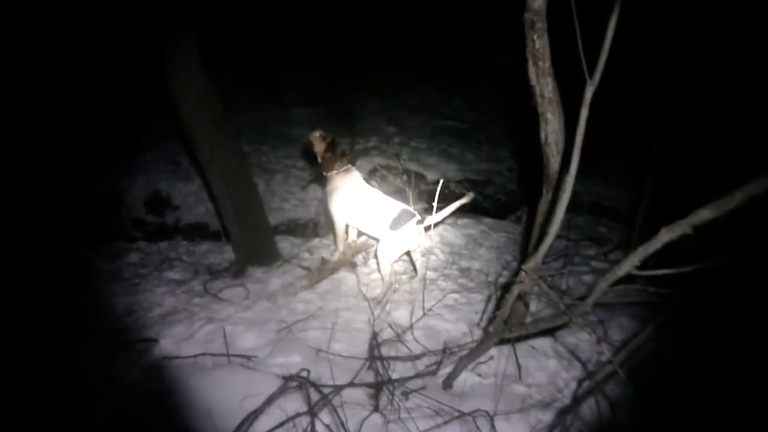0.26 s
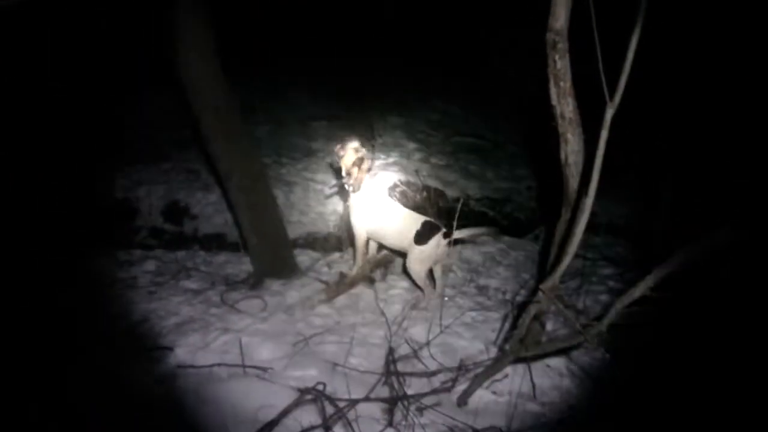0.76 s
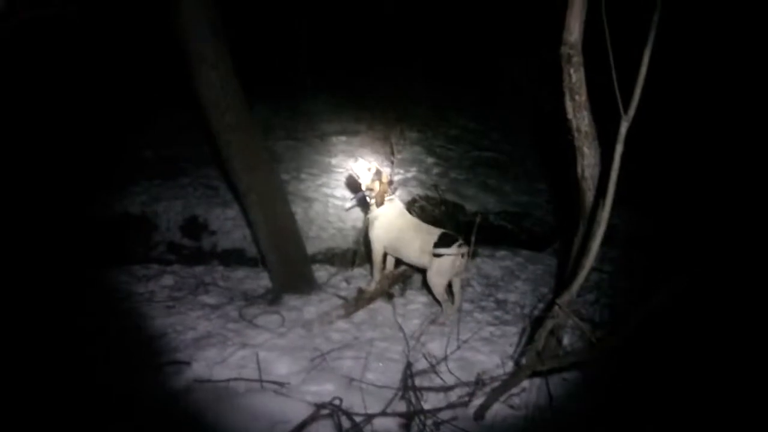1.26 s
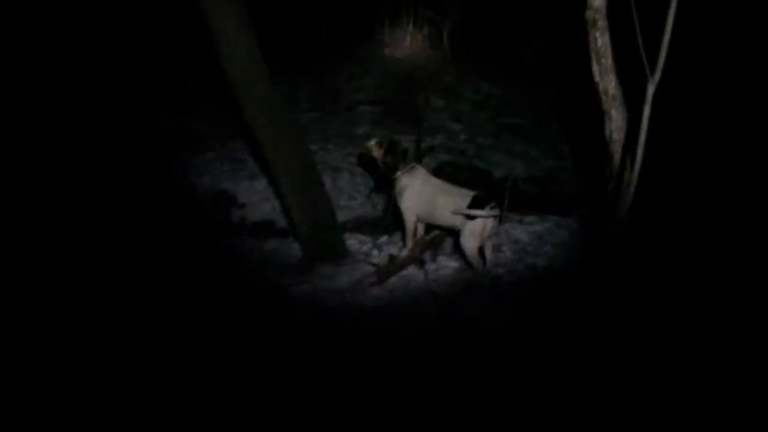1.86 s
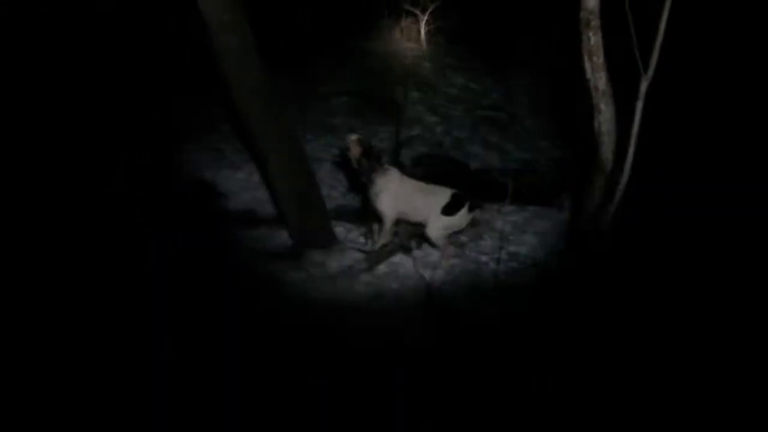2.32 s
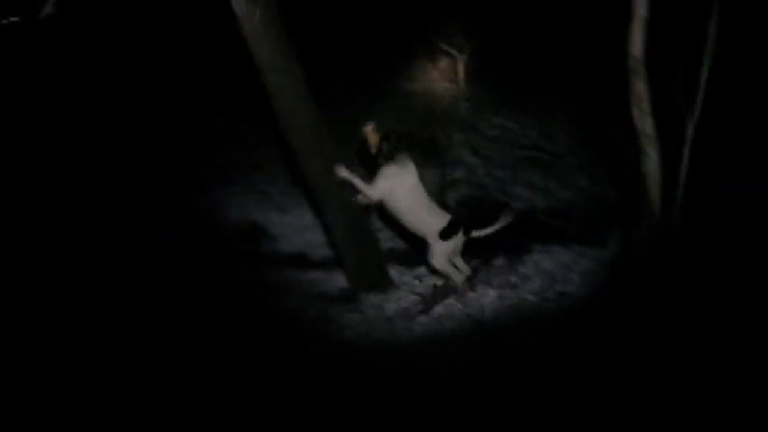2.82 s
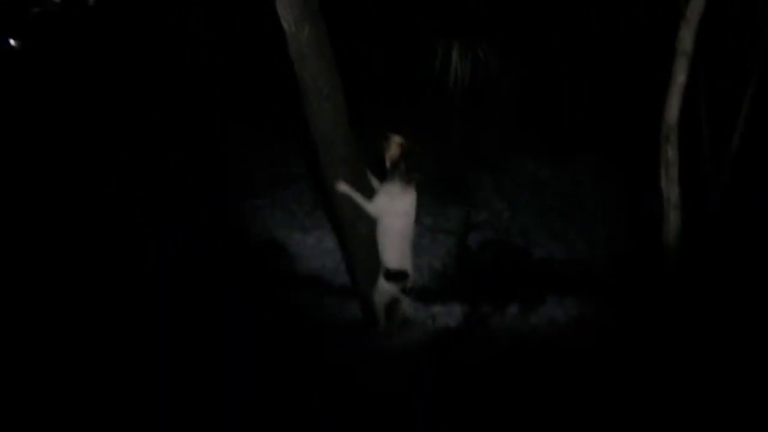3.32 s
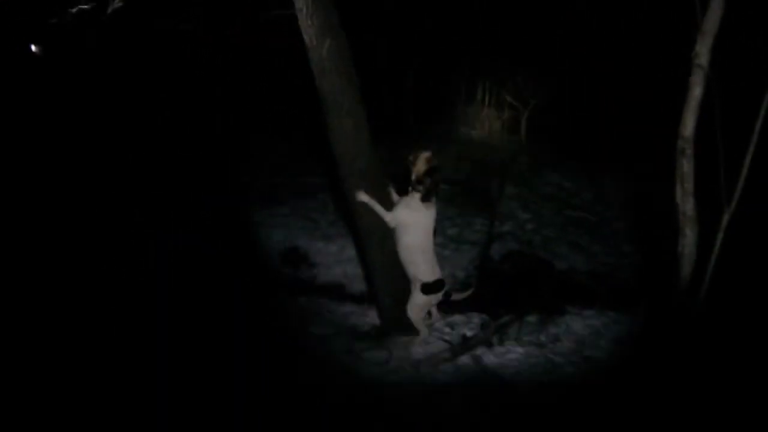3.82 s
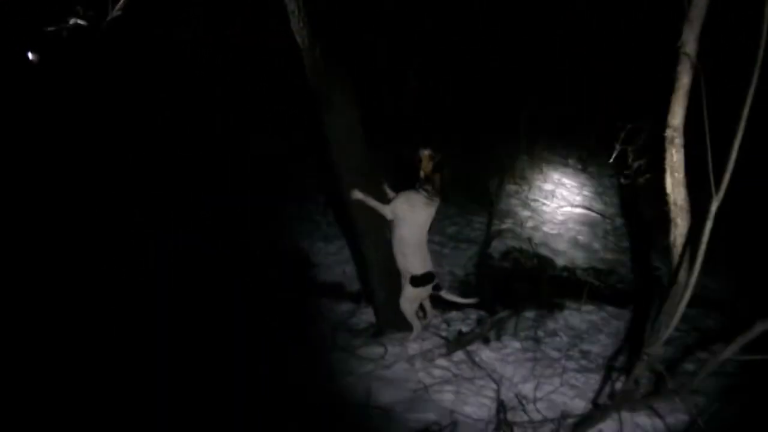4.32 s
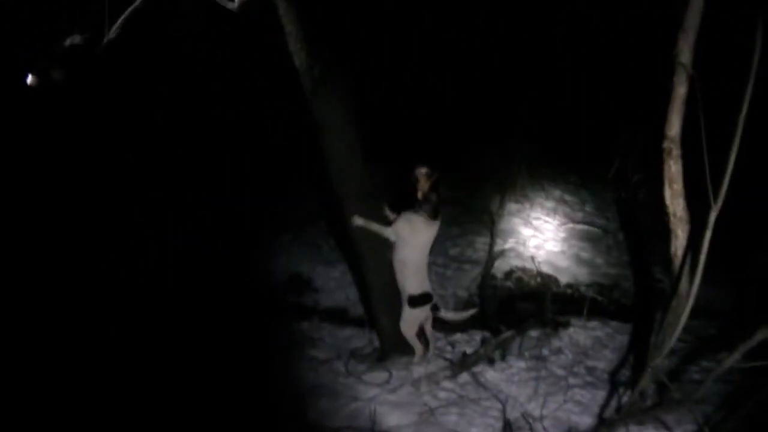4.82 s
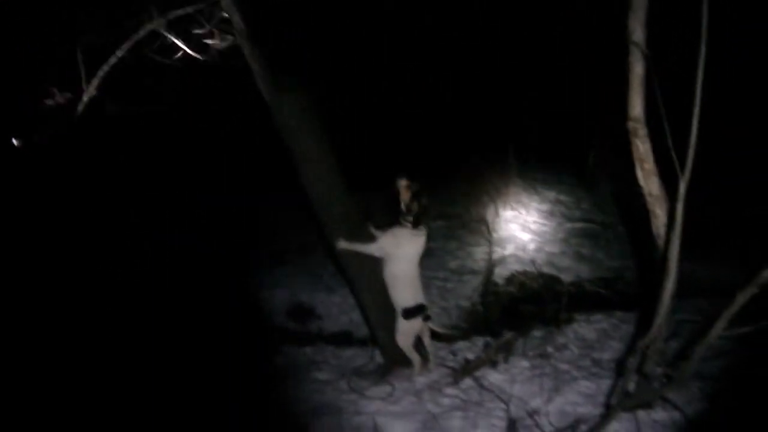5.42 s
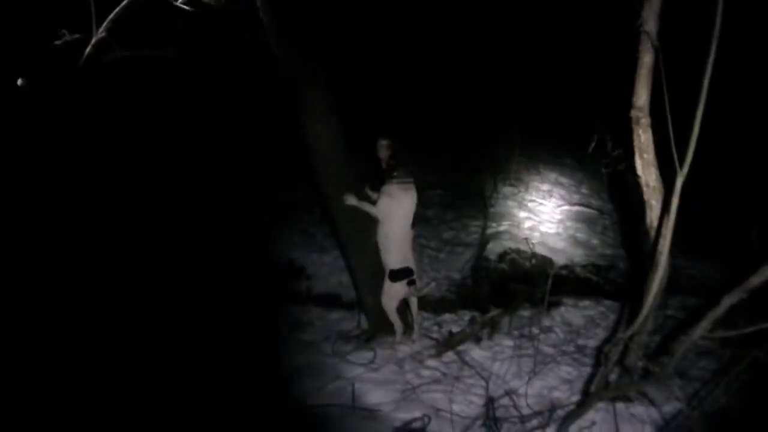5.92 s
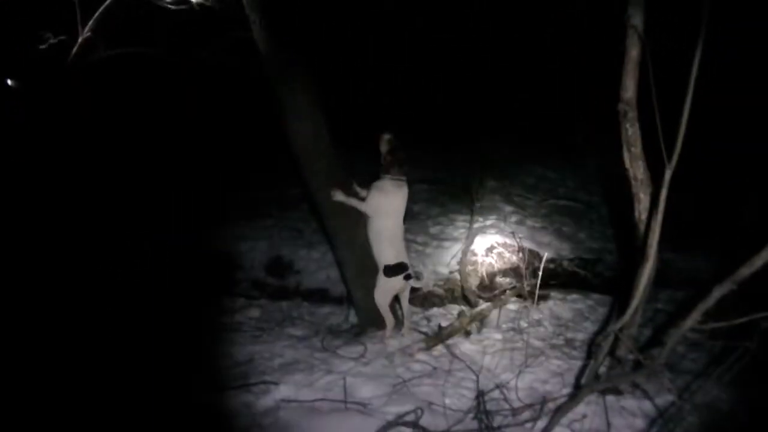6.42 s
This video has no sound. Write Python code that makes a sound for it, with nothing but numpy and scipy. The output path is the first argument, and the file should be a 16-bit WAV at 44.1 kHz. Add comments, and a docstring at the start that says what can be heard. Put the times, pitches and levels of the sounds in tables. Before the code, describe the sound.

A hound barks in quiet woods, centred a few metres ahead of a stereo microphone. The first bark is already under way at the start; others follow at about 0.7, 1.5, 2.2, 2.9, 3.3, 3.8, 4.4, 5.0, 5.7 and 6.2 seconds. Each is short, rising then dropping in pitch, hoarse at both ends and clear on top, and rings among the trees for about a second. Much quieter, paws crunch and thud in snow from 0.5 seconds, with a brief gritty skid near 1.9. Scuffing and scratching on a tree trunk are busiest from 2.4 to 4 seconds. A small collar ring jingles faintly between 2.9 and 3.7 seconds. Dry twigs snap here and there, most clearly at 3.5 and 5.1 seconds. A faint steady hiss with a low, hollow ring of the woods lies underneath throughout.

```python
"""Snowy woods at night: a hound barks up a tree, a few metres straight ahead of a stereo microphone.
Each bark arches in pitch as the vocal folds tighten and slacken, hoarse at both ends and clear on top,
and rings on among the trunks. Paws crunch the snow and scratch the tree, twigs snap and a collar ring
jingles faintly, over a faint hiss and a steady low ring of the woods."""
import sys
import numpy as np
from scipy import signal
from scipy.fft import rfft, irfft, next_fast_len
from scipy.io import wavfile
from scipy.ndimage import map_coordinates

SR = 44100
rng = np.random.default_rng(int(sys.argv[2]) if len(sys.argv) > 2 else 0)


def master_out(mix):
    """Clip the mix to full scale and print it as 16-bit PCM to the path in sys.argv[1]."""
    frames = np.transpose(np.atleast_2d(mix))
    ceiling = np.clip(frames, -1, 1)
    pcm = np.round(ceiling * 32767).astype(np.int16)
    wavfile.write(sys.argv[1], SR, pcm)


N = 293706
TOP_HZ = 15450  # band limit


def amp(db):
    """Decibels to gain."""
    return 10 ** (np.asarray(db) / 20)


def unit(x):
    """Scale to rms 1."""
    return x / np.sqrt(np.mean(x ** 2) + 1e-20)


def along(points, hz):
    """Read (f/Hz, value) points on a log frequency axis."""
    f, v = np.transpose(points)
    return np.interp(np.log(hz + 1), np.log(f), v)


def wobble(rate, size):
    """A smooth random curve, rate knots a second."""
    return map_coordinates(rng.standard_normal(int(size * rate / SR) + 4), [np.arange(size) * rate / SR])


def filtered(x, response):
    """Filter x by a gain that depends on frequency."""
    n = x.shape[-1]
    m = next_fast_len(n + 8192)
    return irfft(rfft(x, m) * response(np.fft.rfftfreq(m, 1 / SR)), m)[..., :n]


def coloured(x, spectrum):
    """Shape x by (f/Hz, level/dB) points, at rms 1."""
    return unit(filtered(x, lambda hz: amp(along(spectrum, hz))))


def rippled(x, depth_db, width_hz, life_s):
    """Pass x through narrow resonances that come and go, at rms 1."""
    z = signal.stft(x, SR, nperseg=256)[2]
    rows, cols = np.indices(z.shape)
    grid = [rows * SR / 256 / width_hz, cols * 128 / SR / life_s]
    field = map_coordinates(rng.standard_normal(z.shape), grid, mode='mirror')
    return unit(signal.istft(z * amp(depth_db * np.tanh(field)), SR, nperseg=256)[1][:len(x)])


def add(track, s, sound):
    """Mix a sound into a track at time s, which may be negative."""
    start = round(s * SR)
    sound = sound[max(-start, 0):]
    part = track[max(start, 0):][:len(sound)]
    part += sound[:len(part)]


def background(db):
    """A faint hiss, wider in the treble, with a steady low ring of the woods near 500 Hz."""
    spectrum = [(25, -15.5), (60, -14), (140, -14), (280, -18), (480, 2.5), (830, -6), (1100, -10.5),
                (1700, -10), (3000, -17.5), (6000, -17), (9000, -21), (12000, -17), (15000, -23)]  # hiss and low ring of the woods: f/Hz, level/dB
    likeness = [(30, .5), (150, 1), (400, 1), (2000, 1), (5000, 0.69), (12000, 0.042)]  # stereo image of the background: f/Hz, left-right correlation
    angle = lambda hz: np.arccos(np.clip(along(likeness, hz), -1, 1)) / 2
    response = lambda hz: amp(along(spectrum, hz)) * [np.cos(angle(hz)), np.sin(angle(hz))]
    mid, side = filtered(rng.standard_normal((2, N)), response)
    return amp(db) * unit(np.array([mid + side, mid - side]))


def woods_response(near_db, near_t60, far_db, slope_db, slope_s):
    """Near trunks scatter a quick answer, the slope returns a dull echo, and the far wood rings on."""
    decay = [(150, 0.61), (480, 1.34), (900, 1.47), (1700, 0.89), (3000, 0.9), (8000, 0.14)]  # ring of the far wood: f/Hz, t60/s
    hz, t, z = signal.stft(rng.standard_normal(SR * 3 // 2), SR, nperseg=256)
    far = signal.istft(z * amp(-60 * t / along(decay, hz)[:, None]), SR, nperseg=256)[1]
    t = np.arange(len(far)) / SR
    far = far * np.minimum(t / 0.037, 1)
    far = amp(far_db) * far / np.linalg.norm(far)
    far[round(slope_s * SR)] += amp(slope_db)
    # the wood carries the middle of the voice; snow and distance soak up the treble: f/Hz, level/dB
    carry = [(420, -2.0), (550, 5.5), (830, 1.5), (1050, -3.5), (1700, 4), (4000, -8.5)]
    far = filtered(far, lambda hz: amp(along(carry, hz)))
    near = rng.standard_normal(len(t)) * amp(-60 * t / near_t60) * (t > .012)
    return far + amp(near_db) * near / np.linalg.norm(near)


def woods(x):
    """Echoes come from all round, but only their treble differs at the two close microphone ports."""
    responses = [woods_response(near_db=-17, near_t60=0.12, far_db=-29, slope_db=-24.5, slope_s=0.075)
                 for _ in range(2)]
    mid, side = [signal.fftconvolve(x, response)[:N] for response in responses]
    side = filtered(side, lambda hz: amp(along([(500, -51), (1700, -44), (3000, -18.5), (9000, 9)], hz)))
    return np.array([mid + side, mid - side])


def collar():
    """A small steel ring chimes at each shake."""
    shakes = [(2.865, -53), (3.28, -52), (3.335, -46), (3.411, -45.5), (3.681, -52), (3.72, -53)]  # jolts of the collar: t/s, level/dB
    modes = [(10500, 2, 0.19), (11500, -3.5, 0.13)]  # modes of the ring: f/Hz, level/dB, t60/s
    track, t = np.zeros(N), np.arange(SR // 4) / SR
    for s, db in shakes:
        ring = sum(amp(level - 60 * t / t60) * np.sin(2 * np.pi * hz * t + 1.3 * wobble(150, len(t)))
                   for hz, level, t60 in modes)
        add(track, s, amp(db) * ring * np.minimum(t / 0.0016, 1))
    return track


def twigs():
    """Dry snaps: a few milliseconds of noise in the narrow resonances of each twig."""
    snaps = [(0.348, -48, 8800), (2.566, -36.5, 2970), (2.723, -33, 5750), (3.517, -25, 4130),
             (3.601, -40, 6100), (4.145, -40, 4470), (4.187, -41, 4950), (4.821, -51.5, 3570),
             (4.905, -41.5, 2350), (5.124, -22, 3160), (5.142, -29, 3070), (5.177, -37.5, 4200),
             (5.325, -42, 6140), (5.435, -43, 6000), (6.012, -46.5, 5900), (6.605, -43.5, 7050)]  # twigs and flakes of the trunk breaking: t/s, relative level/dB, f/Hz
    track, t = np.zeros(N), np.arange(SR // 20) / SR
    for s, db, hz in snaps:
        colour = [(hz / 20, -45), (hz / 4, -24), (hz * 0.53, -2),
                  (hz * 1.17, 0), (hz * 1.9, -14), (hz * 4, -27)]
        snap = coloured(rng.standard_normal(len(t)), colour)
        snap = rippled(snap, depth_db=8, width_hz=600, life_s=.05)
        add(track, s, amp(db - 2.5 - 60 * t / 0.026) * np.minimum(t / 0.00049, 1) * snap)
    return track


def skid(s, length_s, db):
    """A paw skids over the crust: a gritty scrape that swells quickly and trails off."""
    scrape = [(600, -29), (1500, -17), (1950, -7.5), (2250, 0.5), (2700, -15.5), (3600, -16.5), (4800, -34),
              (12000, -41.5)]  # paw sliding on crust: f/Hz, level/dB
    track = np.zeros(N)
    u = np.linspace(0, 1, int(length_s * SR))
    grit = rng.standard_normal(len(u)) * amp(3 * wobble(400, len(u)))
    add(track, s, amp(db) * np.interp(u, [0, .3, 1], [0, 1, 0]) * coloured(grit, scrape))
    return track


def paws():
    """Each step crushes icy grains; a light rustle goes on as the dog rears against the trunk."""
    scuffs = [(0.546, 0.066, -47.5), (0.637, 0.082, -52), (1.07, 0.11, -50), (1.209, 0.053, -54.5),
              (1.814, 0.05, -51.5), (2.397, 0.18, -50), (2.5, 0.068, -54.5), (2.717, 0.053, -40),
              (2.775, 0.008, -42), (2.794, 0.34, -49), (3.03, 0.24, -48.5), (3.597, 0.09, -46.5),
              (3.733, 0.067, -47), (3.97, 0.095, -49), (4.726, 0.047, -53)]  # paws on snow and trunk: t/s, nominal length/s, relative level/dB
    crunch = [(50, -32), (110, 1.5), (190, 3), (400, 10.5), (1000, 0), (1900, 6), (3000, 3.5), (6000, 0),
              (8500, -4), (15000, -11)]  # crushed snow: f/Hz, level/dB
    rustle = [(0, -69.5), (1.7, -62.5), (2.3, -56), (3.2, -61.5), (4.2, -59), (4.6, -64.5), (6.6, -66)]  # steady stirring underfoot: t/s, level/dB
    track = np.zeros(N)
    grains = lambda n: rng.standard_normal(n) * amp(3 * wobble(400, n) + 2.3 * wobble(50, n))
    for s, length, db in scuffs:
        u = np.linspace(0, 1, int(length * 1.87 * SR))
        envelope = amp(db - 0.5) * np.minimum(u / 0.024, 1) * (1 - u) ** 1.04
        add(track, s, envelope * coloured(grains(len(u)), crunch))
    rustle_db = np.interp(np.arange(N) / SR, *np.transpose(rustle))
    track += amp(rustle_db) * coloured(grains(N), crunch)
    # every clump of crust cracks at its own pitches
    return track.std() * rippled(track, depth_db=5, width_hz=600, life_s=.02)


def footfalls():
    """The heavier steps thud dully in the snow."""
    thuds = [(0.559, -54.5), (1.15, -56), (1.94, -59), (2.423, -46), (2.781, -55), (4.021, -59),
             (4.148, -58.5), (4.259, -64)]  # paws landing: t/s, relative level/dB
    colour = [(50, -24), (90, -13), (140, 1), (230, 3.5), (600, 0.5), (2000, -40)]  # f/Hz, level/dB
    track, t = np.zeros(N), np.arange(SR // 6) / SR
    for s, db in thuds:
        thud = coloured(rng.standard_normal(len(t)), colour)
        add(track, s, amp(db + 8 - 60 * t / 0.17) * np.minimum(t / 0.0028, 1) * thud)
    return track


def overtones(pitch, phase, spectrum, orders, jaw):
    """Harmonics slide through resonances that the jaw scales, each wavering on its own; rms 1."""
    hz = orders[:, None] * pitch
    gain = amp(along(spectrum, hz / jaw)) * (hz < TOP_HZ)
    gain = gain / np.sqrt(np.sum(gain ** 2, axis=0) + 1e-20)
    flutter = amp(5 * np.array([wobble(55, len(pitch)) for _ in orders]))
    offsets = rng.uniform(0, 2 * np.pi, (len(orders), 1))
    return unit(np.sum(gain * flutter * np.sin(orders[:, None] * phase + offsets), axis=0))


def roughness(t, slack, top_hz, hoarse, fray):
    """The folds rattle at first, lock (later the higher the bark), and rattle as they slacken; 0-1."""
    lock_s = 0.02 * 2 ** ((top_hz - 500) / 22)
    end_rough, unlock_s = 0.73, 0.024
    rough = hoarse * np.exp(0.24 * wobble(45, len(t))) + fray
    rough += (1 - rough) * np.exp(-t / lock_s)
    rough += (end_rough - rough) * np.minimum(slack / unlock_s, 1)
    return np.clip(rough, 0, 1) ** 1.4


def bark(build_s, hold_s, top_hz, climb_s, crack, jaw_s, sag_db,
         first_db, second_db, second_loss_db, upper_db, upper_loss_db, edge_db, hoarse):
    """One bark: pitch and chest pressure climb, the jaw closes, then the vocal folds slacken."""
    throat = [(500, -13), (1000, 15), (1250, 0), (1400, 6.5), (1560, 5), (1800, 7.5), (2000, -12),
              (2250, -8.5), (2450, -30), (2700, -41.5)]  # resonances of throat and open mouth: f/Hz, level/dB
    edge_colour = [(2300, -35), (2750, -18), (3100, 2.5), (3600, -0.5), (4150, 4), (4800, -3), (5400, -3.5),
                   (6200, 0), (7100, 3.5), (8300, -13.5), (9100, -7.5), (10000, -19.5), (15000, -20.5)]  # thin treble edge of the voice: f/Hz, level/dB
    rasp_low = [(120, -33), (250, -74), (400, -5.5), (590, 5), (820, -5), (1050, -7), (1300, -8.5),
                (1700, -8), (2350, -30.5), (2800, -51)]  # turbulent air in the throat's low resonances: f/Hz, level/dB
    rasp_high = [(700, -38.5), (1100, 2.5), (1350, -6), (1680, -3.5), (2000, 1.5), (2330, -7.5),
                 (2520, -18), (2750, -41), (3500, -41.5)]  # the same in its high resonances: f/Hz, level/dB
    hang_s, let_go_s, release_s, fall_octaves_per_s = 0.00406, 0.00498, .085, 23.8
    scoop, crack_s, sag_at_s, sag_s = .39, 0.01303, 0.1, 0.013
    t = np.arange(int((hold_s + release_s) * SR)) / SR
    n = len(t)
    swell = lambda rise_s, fall_s: np.clip(t / rise_s, 0, 1) * np.clip((t[-1] - t) / fall_s, 0, 1)
    bump = lambda at, half: np.exp(-((t - at) / half) ** 2)
    step = lambda at, half: (1 + np.tanh((t - at) / half)) / 2

    # the pitch scoops up, cracks upward at the end of the hold, then drops
    slack = let_go_s * np.logaddexp(0, (t - hold_s - hang_s) / let_go_s)  # seconds since letting go
    tension = lambda age: 1 - scoop * np.exp(-(age / climb_s) ** 1.2)
    climb = tension(t) / tension(hold_s)
    pitch = top_hz * climb * (1 + crack * bump(hold_s, crack_s)) * 2 ** (-fall_octaves_per_s * slack)
    rough = roughness(t, slack, top_hz, hoarse, fray=0.0944 * sag_db * step(sag_at_s, sag_s))
    jitter = (.002 + .03 * rough) * wobble(350, n) + (.002 + .016 * rough) * wobble(70, n)
    phase = 2 * np.pi * np.cumsum(pitch * (1 + jitter)) / SR

    pressure_db = -16.5 * np.exp(-t / build_s)
    sag = sag_db * bump(sag_at_s, sag_s)  # the overtones thin out in mid-bark
    catch = 65 * crack * bump(hold_s + 0.021, crack_s)  # a hoarse catch follows the crack
    closed = step(jaw_s, 0.0061)  # the closing jaw muffles the overtones
    levels_db = [first_db + 31 * np.log2(climb),  # grows as it climbs into the throat's resonance
                 second_db - second_loss_db * closed - sag,
                 upper_db - upper_loss_db * closed - sag + catch,
                 edge_db - sag]
    release_db_per_s = (522, 242, 250, 210)
    first, second, upper, thin = [amp(db + pressure_db - fall * slack)
                                  for db, fall in zip(levels_db, release_db_per_s)]

    jaw = 1 + np.linspace(.06, -.07, n)  # the jaw draws the resonances down
    waver = lambda: amp(1.28 * wobble(70, n))
    low = first * waver() * np.sin(phase)
    low += second * waver() * np.sin(2 * phase + rng.uniform(0, 2 * np.pi))
    high = overtones(pitch, phase, throat, np.arange(3, 13), jaw)
    high = rippled(high, depth_db=2.5, width_hz=300, life_s=.04)
    tone = (np.sqrt(2) * low + upper * high) * amp((.3 + 2 * rough) * wobble(160, n))

    # air rushes through the folds once a cycle and replaces the tone as they rattle
    puffs = lambda: (1 + 0.81 * np.cos(phase)) * rng.standard_normal(n)
    rasp = lambda colour: rippled(coloured(puffs(), colour), depth_db=5, width_hz=170, life_s=.025)
    air = amp(-2.5) * np.hypot(first, second) * rasp(rasp_low) + amp(2) * upper * rasp(rasp_high)
    voice = np.sqrt(1 - rough ** 2) * tone * swell(.008, 0.021) + rough * air * swell(.017, 0.11)

    voiced = .88 * (1 - rough ** 2) * (1 - rough / 2)  # the edge is voiced while the tone is clear
    edge = voiced * overtones(pitch, phase, edge_colour, np.arange(6, 34), jaw)
    edge += np.sqrt(1 - voiced ** 2) * coloured(puffs(), edge_colour)
    edge = rippled(edge, depth_db=10, width_hz=380, life_s=.03)
    return voice + thin * edge * swell(.02, 0.084)


def hound():
    """The run of barks, with brief near-pure tones in or after some; the mouth radiates little bass."""
    # barks: t/s, pressure build-up/s, hold/s, top f/Hz, climb/s, crack/share of pitch, jaw delay/s,
    # sag/dB, fundamental/dB, second harmonic/dB, its loss as the jaw closes/dB, upper harmonics/dB,
    # their loss/dB, treble edge/dB, hoarseness/0-1
    barks = [ (-.055, 0.0089, .12, 451.2, 0.046, 0.018, 0.065, 4, -20, -11, 15, -20.5, 8.5, -47.5, 0.19),
             (0.704, .016, 0.12, 472, .042, 0.027, 0.054, 1, -18.5, -19, 6.5, -18.5, 11.5, -46, 0.34),
             (1.489, 0.012, 0.11, 485.7, 0.045, 0.032, 0.072, 1.5, -17, -22, 7, -20.5, 17.5, -45, 0.31),
             (2.212, 0.019, .127, 501.6, 0.031, 0.013, 0.14, 3, -19, -17.5, 11.5, -20, 8.5, -42.5, 0.28),
             (2.88, 0.015, 0.11, 520, .018, .12, .101, 2.5, -21, -12, 15, -20, 6.5, -40, 0.1),
             (3.305, 0.013, .104, 502, .023, 0.081, 0.054, 4.5, -20.5, -13, 9, -22, 5, -43, 0.45),
             (3.799, 0.013, .121, 501.4, .05, 0.023, 0.063, 1.5, -19, -13.5, 14.5, -24, 10.5, -45, 0.28),
             (4.418, 0.011, 0.12, 496.8, .034, 0.012, 0.13, 2, -20, -16.5, 13.5, -22, 5.5, -40.5, 0.16),
             (5.022, 0.017, .133, 494.4, .053, .01, 0.11, 5, -14, -17, 19, -22, 9.5, -44, 0.18),
             (5.652, 0.026, 0.13, 516.8, 0.027, 0.0543, 0.13, 2.5, -17, -17, 12, -19, 7.5, -42, 0.26),
             (6.238, 0.024, 0.12, 512.6, 0.042, 0.0665, 0.066, 6, -15.5, -17, 14, -20.5, 10, -47.5, 0.26), ]
    # squeaks in a bark and short ringing echoes just after it: t/s, length/s, f/Hz, relative level/dB
    brief_tones = [(2.211, 0.033, 591, -23), (2.874, 0.026, 702, -23), (3.289, 0.053, 659.6, -20),
                   (2.987, 0.043, 564, -19.5), (3.036, .045, 561, -26), (5.19, 0.041, 500.6, -29.5),
                   (5.829, 0.031, 540, -28)]
    track = np.zeros(N)
    for s, *shape in barks:
        add(track, s, bark(*shape))
    for s, length, hz, db in brief_tones:
        u = np.linspace(0, 1, int(length * SR))
        phase = 2 * np.pi * np.cumsum(hz * (1 + 0.0082 * wobble(100, len(u)))) / SR
        envelope = amp(db + 5) * np.abs(np.sin(np.pi * u)) ** 0.82
        add(track, s, envelope * (np.sin(phase) + amp(-22) * np.sin(2 * phase)))
    return filtered(track, lambda hz: hz ** 4 / (hz ** 4 + 205 ** 4))


def scene():
    """The dog is dead centre, a few metres off, with the woods all round the microphone."""
    dog = hound() + paws() + footfalls() + skid(s=1.892, length_s=0.14, db=-42) + twigs() + collar()
    return dog + woods(dog) + background(db=-58.5)


def record(dry):
    """The sound eases in over 4 ms; the recorder keeps nothing above its band limit."""
    ease = np.minimum(np.arange(N) / SR / .004, 1)
    return filtered(dry * ease, lambda hz: hz < TOP_HZ)


dry = scene()
out = record(dry)
master_out(out)
```